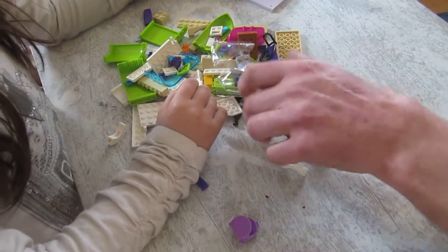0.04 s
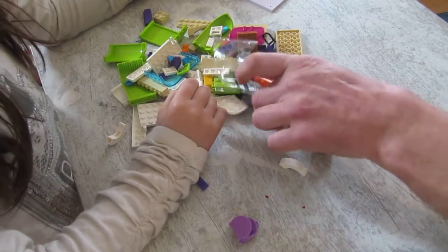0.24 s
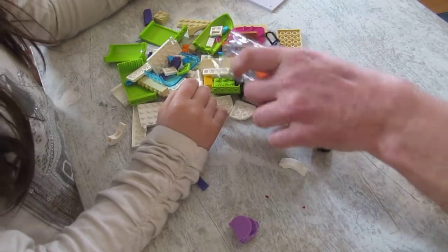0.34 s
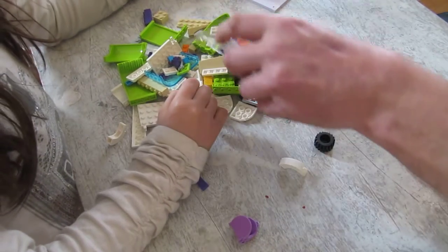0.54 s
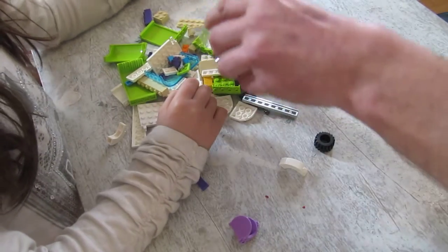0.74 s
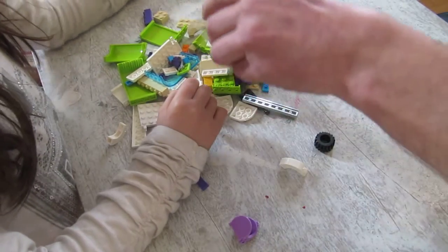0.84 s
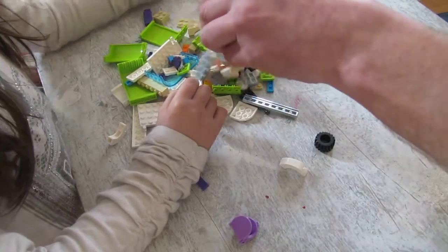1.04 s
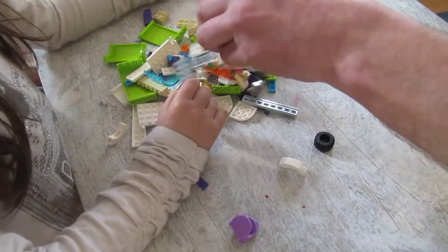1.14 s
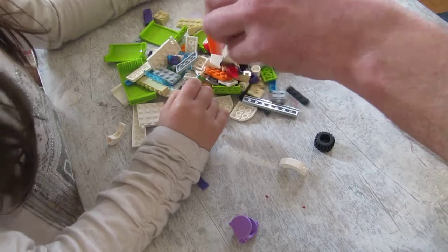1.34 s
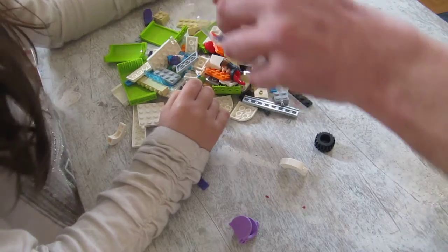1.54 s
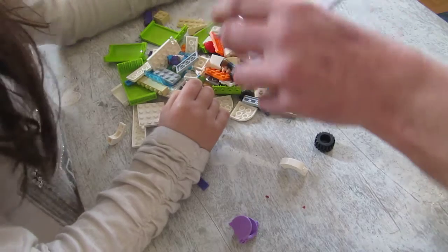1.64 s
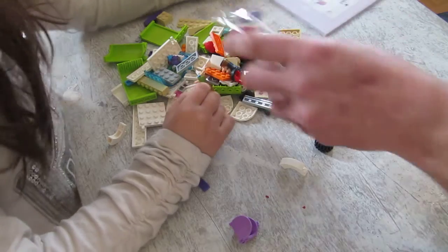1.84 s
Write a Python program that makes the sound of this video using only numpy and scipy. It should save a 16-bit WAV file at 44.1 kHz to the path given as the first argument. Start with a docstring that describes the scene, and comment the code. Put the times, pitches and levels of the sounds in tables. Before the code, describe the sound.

Small plastic building bricks clatter from a bag onto a pile on a table.

```python
"""Small plastic building bricks are shaken from a thin bag onto a pile on a table, close by in a living room.
Each impact excites the damped modes of a piece: single bricks click sharply, and two pours of
tiny collisions merge into a clatter that sets the table top drumming softly. Near the end, friction
makes a swish and a faint hum as a hand draws the bag away and slides over the table.
A short reverberant tail and a quiet background lie behind them."""
import sys
import numpy as np
from scipy import signal
from scipy.fft import rfft, irfft, next_fast_len
from scipy.io import wavfile
from scipy.ndimage import uniform_filter1d

SR = 44100
rng = np.random.default_rng(int(sys.argv[2]) if len(sys.argv) > 2 else 0)


def persist_wave(psi):
    """Save psi, clipped to +-1, as 16-bit WAV."""
    counts = np.round(np.clip(psi, -1, 1) * 32767).astype(np.int16)
    wavfile.write(sys.argv[1], SR, np.atleast_2d(counts).T)


N = 83790

CLICK_TRIM_DB, CLICK_WINDOW_S, CLICK_ATTACK_S = 1, 0.0038, 0.0001
CRACK_SHARE, CRACK_T60_S = 0.7, 0.0026   # the contact itself, before the piece rings on
# The registers of a brick: body, knock, clack and tick. Each row: lower and upper edge in Hz.
REGISTERS = [(450, 1442), (1500, 3500), (3500, 7000), (7000, 14000)]
# Impacts of brick on brick. Each row: start in seconds, body, knock, clack and tick levels in dB,
# ring time (t60, a fall of 60 dB) in seconds.
BRICK_IMPACTS = [(0.2017, -51, -45.5, -41.5, -38, 0.0024), (0.23, -36.5, -32.5, -35.5, -33.5, 0.011),
                 (0.2468, -42, -38, -30, -32, 0.034), (0.2552, -37, -32, -26, -40, 0.026),
                 (0.2606, -35.5, -26, -26, -29, 0.015), (0.289, -37, -45, -32.0, -26.5, 0.02),
                 (0.2961, -39, -40, -26.5, -28, 0.023), (0.3113, -41, -31.5, -26, -26, 0.012),
                 (0.3376, -39, -34, -38, -28.5, 0.0051), (0.3429, -55, -39, -27.5, -39, 0.0033),
                 (0.376, -48, -39, -33, -28.5, 0.037), (0.383, -46, -54, -26.5, -26, 0.04),
                 (0.3853, -52.0, -33.5, -27, -24, 0.013), (0.4094, -45, -31, -32, -35, 0.024),
                 (0.4379, -56, -40, -24, -39, 0.002), (0.5308, -57, -34.5, -37, -39.5, 0.018),
                 (0.5555, -52, -38.5, -41, -40, 0.0082), (0.616, -52.0, -36.5, -37.5, -45, 0.017),
                 (0.6361, -51, -42, -42, -43, 0.014), (0.6544, -63, -36.5, -38, -37, 0.013),
                 (0.6605, -46, -33.5, -43, -29.5, 0.013), (0.665, -45, -34.5, -32, -32.5, 0.023),
                 (0.6708, -51, -37, -35, -35, 0.027), (0.7237, -47, -33.0, -37, -32, 0.03),
                 (0.7362, -44, -30.5, -34, -44, 0.013), (0.7421, -43.5, -34, -29.5, -38, 0.011),
                 (0.7987, -42, -35, -40.5, -43, 0.026), (0.8734, -39, -42, -41, -42, 0.0076),
                 (0.8969, -50, -42, -31.5, -22, 0.0091), (0.9133, -48.5, -41, -32, -24.5, 0.015),
                 (0.9687, -42, -30, -31.5, -25, 0.056), (0.973, -40, -29.5, -26.5, -22.5, 0.009),
                 (1.0016, -53, -32.5, -32, -26, 0.035), (1.1012, -44, -40, -42, -26, 0.0088),
                 (1.135, -46, -44, -28.5, -24.5, 0.024), (1.2005, -47.0, -38, -28, -24.5, 0.0076),
                 (1.2666, -34.5, -31.5, -29.5, -28, 0.02), (1.3221, -53, -38, -43, -27, 0.0033),
                 (1.3278, -58, -51, -50, -25, 0.009), (1.3327, -56.0, -34, -32, -26, 0.013),
                 (1.34, -54, -49, -30.5, -31, 0.0069), (1.3811, -55, -38, -34.5, -36.0, 0.0072),
                 (1.4795, -54, -44.5, -42, -38, 0.016), (1.5076, -45, -42.5, -43.5, -47, 0.023),
                 (1.5963, -34.5, -38.5, -45, -37, 0.012), (1.6088, -39.5, -45, -49.0, -45, 0.013),
                 (1.6227, -51.0, -58, -30.5, -30, 0.0058), (1.6284, -52, -40.5, -46, -30.5, 0.005),
                 (1.7454, -52, -45, -44.5, -46, 0.025), (1.8568, -50, -45, -49.5, -50, 0.016)]
def clicks():
    """Impact excitation: a noisy contact crack, and the free decay of each piece's own modes."""
    t = np.arange(SR // 20) / SR
    attack = 1 - np.exp(-t / CLICK_ATTACK_S)
    window = np.clip((CLICK_WINDOW_S - t) * SR, 0, 1)   # the level is set over this first stretch
    out = np.zeros(N + SR)
    for start_s, *levels, t60 in BRICK_IMPACTS:
        start = int(start_s * SR)
        for (low_hz, high_hz), db in zip(REGISTERS, levels):
            hz = mode_pitches(low_hz, high_hz, count=18)
            modes = rng.standard_normal(len(hz)) @ np.sin(2 * np.pi * hz[:, None] * t)
            crack = rms_one(band(rng.standard_normal(len(t)), low_hz, high_hz))
            click = rms_one(modes) * decay(t, t60) + CRACK_SHARE * crack * decay(t, CRACK_T60_S)
            click = band(click * attack, low_hz / 2, high_hz * 2)
            power = np.sum(click ** 2 * window) / (CLICK_WINDOW_S * SR)
            out[start:start + len(t)] += from_db(db + CLICK_TRIM_DB) * click / np.sqrt(power)
    return out[:N]


FULL_POUR_HITS_PER_S, FULL_POUR_DB, HIT_RATE_EXPONENT = 1700, -29, .5
TUMBLE_T60_S, T60_LOG_SPREAD, MODE_SPREAD_DB, SLIDE_SHARE = 0.019, 0.47, 2.5, 0.36
# Balance of the clatter: one gain in dB for each register.
POUR_TRIM_DB = [-2.5, -0.65, -1.74, -0.3]
# Envelope of the tumbling mass. Each row: time in seconds, body, knock, clack and tick levels in dB.
POUR_LEVELS = [(0.18, -72, -73, -77, -82), (0.215, -48.5, -45, -45, -43.5), (0.27, -33.5, -36.5, -29, -35),
               (0.32, -41.5, -31.5, -32.5, -31), (0.36, -39.5, -42.5, -35.5, -37.5),
               (0.41, -40, -36.5, -35.5, -40), (0.47, -50, -44, -40, -41.5), (0.51, -49.5, -52, -48, -52.5),
               (0.57, -58, -64, -65, -54), (0.64, -51, -58, -65, -53), (0.68, -60, -47, -42, -43),
               (0.8, -50.5, -40, -44, -47.5), (0.86, -59, -49.5, -47, -50.5), (0.93, -47, -44, -37.5, -37),
               (0.955, -71, -46.5, -42.5, -33), (0.985, -45, -33.5, -27.5, -26.5),
               (1.06, -42, -38, -29.5, -27), (1.14, -47.5, -35, -29.5, -26), (1.2, -42.5, -35, -27.5, -27),
               (1.25, -43, -40, -35.5, -34), (1.31, -45.5, -38.5, -38.5, -35),
               (1.38, -47, -38.5, -35, -35.5), (1.46, -51.5, -48.5, -49.5, -53),
               (1.54, -53.5, -81, -80, -59), (1.63, -59, -50, -54, -48.5), (1.76, -49, -47, -51, -55.5),
               (1.89, -68, -74, -78, -56.5)]
def tumble():
    """Superposition of random impacts, whose rate follows the tick level; sliding friction adds hiss."""
    levels = in_time(POUR_LEVELS)
    hits_per_s = FULL_POUR_HITS_PER_S * from_db(HIT_RATE_EXPONENT * (levels[-1] - FULL_POUR_DB))
    candidates = 5000
    starts = rng.integers(0, N, size=candidates)
    happens = rng.random(candidates) < hits_per_s[starts] * N / SR / candidates
    sizes = hit_sizes(candidates)[happens]
    t = np.arange(SR // 50) / SR
    positions = (starts[happens, None] + np.arange(len(t))).ravel()
    out = np.zeros(N)
    for (low_hz, high_hz), db, trim_db in zip(REGISTERS, levels, POUR_TRIM_DB):
        rings = np.zeros(N)
        for _ in range(3):   # modes per hit in this register
            hz = low_hz + (high_hz - low_hz) * rng.random(candidates)[happens]
            strength, sustain, polarity = np.clip(rng.standard_normal((candidates, 3))[happens].T, -2, 2)
            t60 = TUMBLE_T60_S * np.exp(T60_LOG_SPREAD * sustain)
            gain = sizes * np.sign(polarity) * from_db(MODE_SPREAD_DB * strength)
            modes = gain[:, None] * struck_mode(t, hz[:, None], t60[:, None])
            rings += np.bincount(positions, modes.ravel(), N)[:N]
        rings = band(rings, low_hz / 2, high_hz * 2)
        slide = band(rng.standard_normal(N), low_hz, high_hz)
        out += from_db(db + trim_db) * steadied(rms_one(rings) + SLIDE_SHARE * rms_one(slide), size=1000)
    return out


SNAP_CRACK_DB, SNAP_CRACK_HZ = -2, (11400, 13400)
SNAP_RISE_SHARE = 0.075   # share of the t60 in which the ring builds, while the pieces touch
# Modes of a brick, a flat plate, a larger hollow piece and a tiny stud.
# Each row: frequency in Hz, level in dB.
BRICK_MODES = [(1820, -16), (2930, -8), (3850, -7), (5150, -1), (6150, -1), (7150, -1), (8000, -2),
               (8700, -3), (10150, -5), (12400, -5)]
PLATE_MODES = [(2010, -5), (2340, -0.5), (2580, 0), (3140, 2), (3830, -6), (4570, -8)]
HOLLOW_MODES = [(1050, -6), (2250, -5.5), (3380, -5.5), (4780, -0.5), (5900, -3.5), (7900, -3), (8810, -7),
                (10100, 0.5)]
STUD_MODES = [(5910, 0), (8070, -5.5), (8800, -5.5), (9810, -4.5), (10450, -5)]
# Pieces struck hard. Each row: table of modes, start in seconds, level in dB, t60 in seconds.
HARD_STRIKES = [(BRICK_MODES, 0.5618, -6.5, 0.0042), (PLATE_MODES, 1.2631, -15, 0.022),
                (HOLLOW_MODES, 1.5661, -13.5, 0.0067), (STUD_MODES, 1.6996, -17, 0.0059)]
def snap(modes, start_s, level_db, t60):
    """Impulse response of one piece: a bright crack starts all its modes together, and they die fast."""
    t = np.arange(N) / SR - start_s
    rings = sum((-1) ** k * from_db(db) * struck_mode(t, hz, t60) for k, (hz, db) in enumerate(modes))
    age = np.maximum(t, 0)
    crack = rms_one(band(rng.standard_normal(N), *SNAP_CRACK_HZ)) * (t >= 0) * decay(age, CRACK_T60_S)
    rise = 1 - np.exp(-age / (SNAP_RISE_SHARE * t60))
    return from_db(level_db) * (rise * rings + from_db(SNAP_CRACK_DB) * crack)


# Small ringing pieces. Each row: start in seconds, frequency in Hz, level in dB, t60 in seconds.
RINGING_PIECES = [(0.2607, 1550, -24, 0.029), (0.3112, 5215, -21, .07), (0.337, 11660, -19, .02),
                  (.383, 13700, -13, .02), (0.4094, 1900, -25.5, 0.022), (0.664, 7005, -25, .035),
                  (0.9132, 10106, -17, 0.022), (0.9686, 7120, -16.5, 0.031), (1.0021, 11886, -12, .025),
                  (1.033, 11370, -18, .03), (1.072, 5455, -22.5, 0.048), (1.08, 10750, -19.5, .03),
                  (1.13, 11310, -20, 0.027), (1.166, 10740, -20, 0.027), (1.111, 10680, -19.5, 0.032),
                  (1.192, 4823, -20, 0.056), (1.2005, 12900, -13, .02), (1.2666, 9360, -23.5, 0.029),
                  (1.328, 10740, -14.5, 0.028)]
def pings():
    """Free vibration in a single mode: small stiff pieces ring at one clear pitch above the clatter."""
    t = np.arange(N) / SR
    return sum(from_db(db) * struck_mode(t - start_s, hz, t60) for start_s, hz, db, t60 in RINGING_PIECES)


TABLE_TRIM_DB, TABLE_HITS_PER_S = 3.5, 260
# Modes of the table top. Each row: frequency in Hz, level in dB, t60 in seconds.
TABLE_MODES = [(140, -13, .1), (176, -6, .14), (205, 0, .25), (244, -5, .17), (305, -15, .08),
               (420, -16, .04), (660, -15, .04)]
# Envelope of the drumming under the pile. Each row: time in seconds, level in dB.
DRUMMING_LEVELS = [(0.2, -82), (0.25, -54), (0.3, -43.5), (0.335, -54.5), (0.37, -40.5), (0.41, -59),
                   (0.47, -51), (0.53, -65), (0.66, -55), (0.8, -56), (0.86, -67), (0.912, -45),
                   (0.95, -53), (0.98, -40), (1.07, -46.5), (1.14, -44.5), (1.2, -40.5), (1.25, -48.5),
                   (1.4, -51), (1.47, -64), (1.6, -63.5)]
def table_drumming():
    """Forced vibration: falling pieces keep the low modes of the table top ringing."""
    db, = in_time(DRUMMING_LEVELS)
    top = resonate(collisions(TABLE_HITS_PER_S), TABLE_MODES)
    return from_db(db + TABLE_TRIM_DB) * steadied(band(top, 139, 840), size=1500)


BUMP_HZ, BUMP_T60_S = 82, 0.098
# Dull knocks of pieces and hand on the table. Each row: start in seconds, level in dB.
TABLE_KNOCKS = [(0.238, -48), (0.296, -51), (1.567, -46), (1.62, -51)]
def bumps():
    """A damped mass on a spring: the whole table gives under the heavier knocks."""
    t = np.arange(N) / SR
    return sum(from_db(db) * struck_mode(t - start_s, BUMP_HZ, BUMP_T60_S) for start_s, db in TABLE_KNOCKS)


SWISH_WIDTH_HZ = 610
# The bag being drawn away. Each row: time in seconds, level in dB, centre frequency in Hz.
BAG_MOTION = [(1.6, -74, 1900), (1.64, -43, 1750), (1.7, -60, 2254), (1.76, -48.5, 2006),
              (1.81, -47.5, 1598), (1.87, -61, 1396)]
def bag_swish():
    """Friction noise: a narrow band whose centre follows the speed of the hand."""
    db, centre_hz = in_time(BAG_MOTION)
    low_pass = signal.butter(2, SWISH_WIDTH_HZ / 2, fs=SR, output="sos")
    slow_noise = signal.sosfilt(low_pass, rng.standard_normal((2, N)))
    phase = 2 * np.pi * np.cumsum(centre_hz) / SR
    return from_db(db) * rms_one(slow_noise[0] * np.cos(phase) + slow_noise[1] * np.sin(phase))


# Modes that rubbing excites. Each row: frequency in Hz, level in dB, t60 in seconds.
RUB_MODES = [(251, 8, .07), (436, 2.5, 0.025), (528, 2.5, 0.013)]
# Envelope of the hand sliding over the table. Each row: time in seconds, level in dB.
RUB_LEVELS = [(1.5, -93), (1.62, -61.5), (1.72, -56.5), (1.76, -47.5), (1.82, -48), (1.88, -51)]
def hand_rub():
    """Resonance driven by friction: skin dragging on the table makes it hum faintly."""
    db, = in_time(RUB_LEVELS)
    hum = resonate(rng.standard_normal(N), RUB_MODES)
    return from_db(db) * rms_one(band(hum, 270, 650))


ROOM_DB, ROOM_T60_S, ROOM_DELAY_S, ROOM_TOP_HZ = -15, .28, 0.0048, 6670
def room(x):
    """Reverberation: diffuse reflections form a slightly dull tail that decays exponentially."""
    t = np.arange(SR // 2) / SR
    onset = np.clip(t / ROOM_DELAY_S - 1, 0, 1)
    tail = band(rng.standard_normal(len(t)), 122, ROOM_TOP_HZ) * decay(t, ROOM_T60_S) * onset
    return from_db(ROOM_DB) * signal.fftconvolve(x, tail / np.sqrt(np.sum(tail ** 2)))[:N]


BACKGROUND_DB = -50.5
# Spectrum of the room's background. Each row: frequency in Hz, relative spectral density in dB.
BACKGROUND_SPECTRUM = [(15, -22), (25, -11.5), (130, -13), (326, -17), (607, -10), (1480, -14),
                       (2550, -7.5), (3080, -5.5), (3430, -6.5), (3720, -9.5), (4610, -11), (11000, -16.5),
                       (16000, -41)]
def background():
    """Stationary noise: a quiet, even hiss with a fixed spectrum."""
    return from_db(BACKGROUND_DB) * rms_one(coloured(rng.standard_normal(N), BACKGROUND_SPECTRUM))


def from_db(db):
    """Decibels to amplitude ratio."""
    return 10 ** (np.asarray(db) / 20)


def rms_one(x):
    """Normalisation to unit rms."""
    return x / np.sqrt(np.mean(x ** 2) + 1e-20)


def in_time(rows):
    """Linear interpolation of each column of an envelope table, sample by sample."""
    times, *columns = np.transpose(rows)
    return [np.interp(np.arange(N) / SR, times, column) for column in columns]


def band(x, low_hz, high_hz):
    """Causal band-pass filtering."""
    sections = signal.butter(2, [low_hz, min(high_hz, .45 * SR)], "band", fs=SR, output="sos")
    return signal.sosfilt(sections, x)


def coloured(x, points):
    """Minimum-phase filtering along (Hz, dB) points, by folding the cepstrum onto positive time."""
    size = 2 * next_fast_len(N)
    hz, db = np.transpose(points)
    bin_hz = np.fft.rfftfreq(size, 1 / SR)
    gain_db = np.interp(np.log(bin_hz + 1), np.log(hz), db)
    cepstrum = irfft(np.log(from_db(gain_db)))
    cepstrum[1:size // 2] *= 2
    cepstrum[size // 2 + 1:] = 0
    return irfft(rfft(x, size) * np.exp(rfft(cepstrum)))[:N]


def decay(t, t60):
    """Exponential damping: the amplitude falls 60 dB in each t60."""
    return np.exp(-np.log(1000) * np.minimum(t / t60, 10))


def struck_mode(t, hz, t60):
    """A damped harmonic oscillator, struck at t = 0."""
    t = np.maximum(t, 0)
    return np.sin(2 * np.pi * hz * t) * decay(t, t60)


def resonate(force, modes):
    """Modal superposition: one force drives a two-pole resonator for each mode."""
    out = np.zeros(N)
    for hz, db, t60 in modes:
        radius, angle = from_db(-60 / (t60 * SR)), 2 * np.pi * hz / SR
        ring = signal.lfilter([1, 0, -1], [1, -2 * radius * np.cos(angle), radius ** 2], force + 1e-18)
        out += from_db(db) * rms_one(ring)
    return out


def mode_pitches(low_hz, high_hz, count):
    """Uniform modal density: one random frequency in each equal slice of a register."""
    return low_hz + (high_hz - low_hz) * (np.arange(count) + rng.random(count)) / count


def hit_sizes(count, spread_db=2):
    """Exponentially distributed levels: many light hits and a few hard ones."""
    return from_db(spread_db * np.minimum(rng.exponential(1, count), 3.5))


def collisions(per_s):
    """Shot noise: random hits of uneven size, with the same mean power at any rate."""
    sizes = hit_sizes(N) * rng.choice([-1, 1], N)
    return sizes * (rng.random(N) < per_s / SR) / np.sqrt(per_s)


def steadied(x, size):
    """Division by the running rms evens out stretches of `size` samples and keeps the grain within."""
    power = uniform_filter1d(uniform_filter1d(x ** 2, size), size)
    return x / np.sqrt(np.abs(power) + np.mean(x ** 2) / 1000)


# Frequency response of the microphone. Each row: frequency in Hz, gain in dB.
MICROPHONE_RESPONSE = [(30, -2.5), (3000, -1), (5000, 0.5), (6400, -1.5), (8000, 2.5), (9800, 1),
                       (11300, -2), (12000, -11), (12700, -9), (13600, -18), (16000, -15)]
def scene():
    """Superposition: the direct sound, coloured by the microphone, its reverberation and the background."""
    snaps = sum(snap(*strike) for strike in HARD_STRIKES)
    bricks = clicks() + snaps + pings() + tumble()
    direct = coloured(bricks + table_drumming() + bumps() + bag_swish() + hand_rub(), MICROPHONE_RESPONSE)
    hiss = background()
    return (direct + room(direct) + hiss)[None]


CUTOFF_HZ = 16300
def record(dry):
    """Band limiting: a steep low-pass filter removes the highest treble."""
    return signal.sosfilt(signal.ellip(10, .1, 80, CUTOFF_HZ, fs=SR, output="sos"), dry)


dry = scene()
out = record(dry)
persist_wave(out)
```